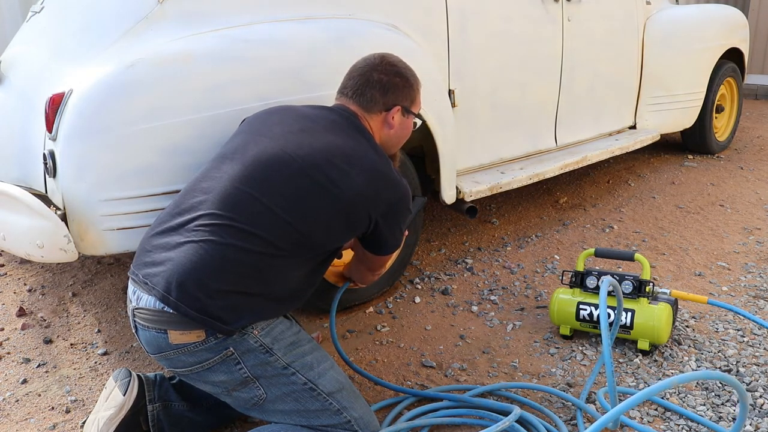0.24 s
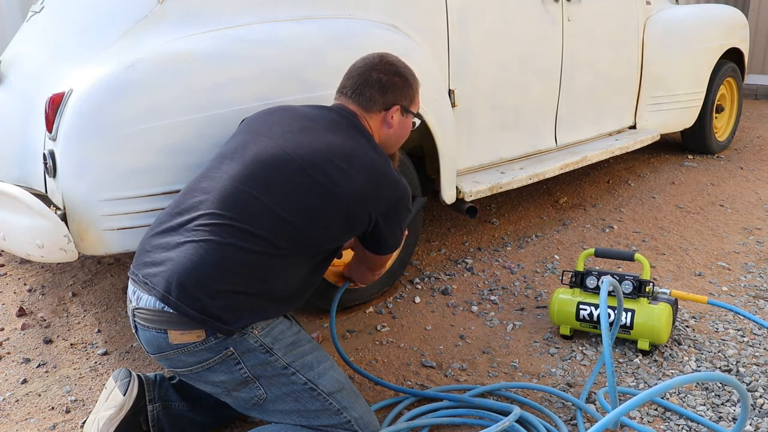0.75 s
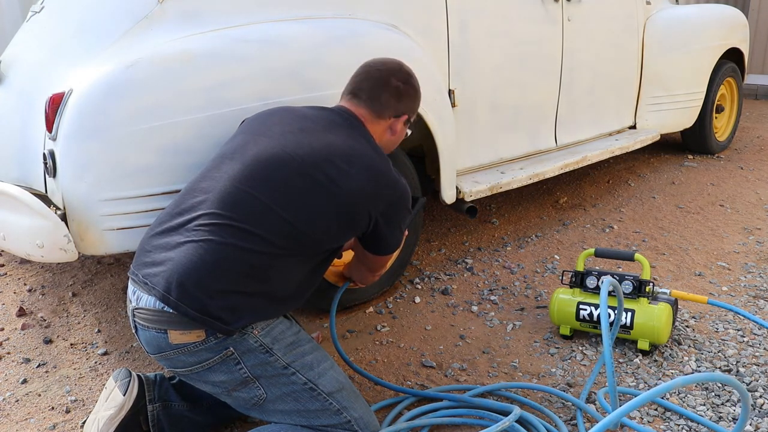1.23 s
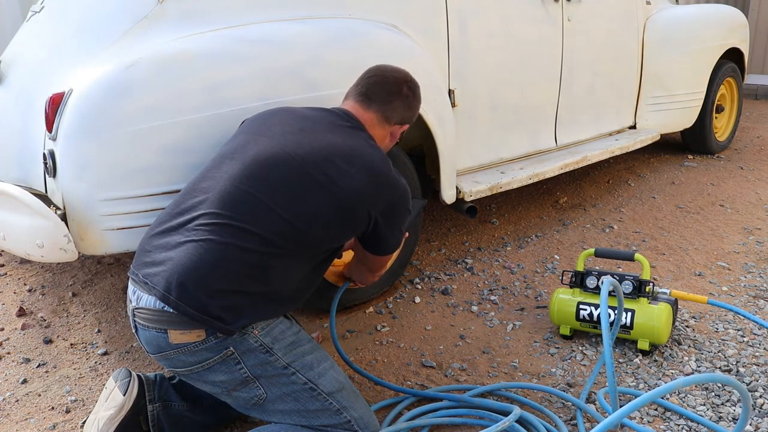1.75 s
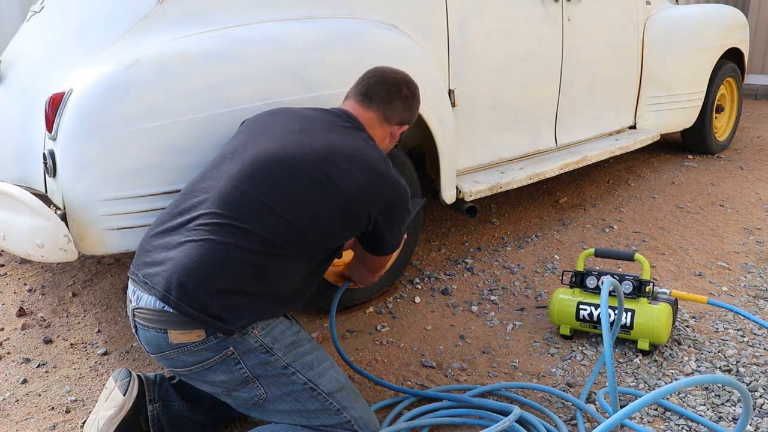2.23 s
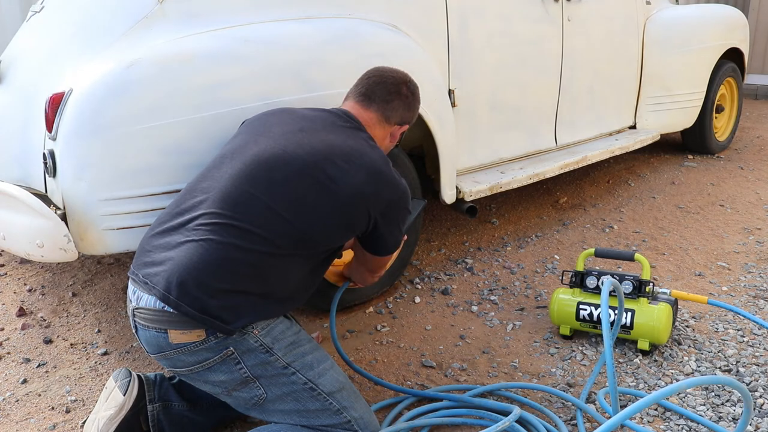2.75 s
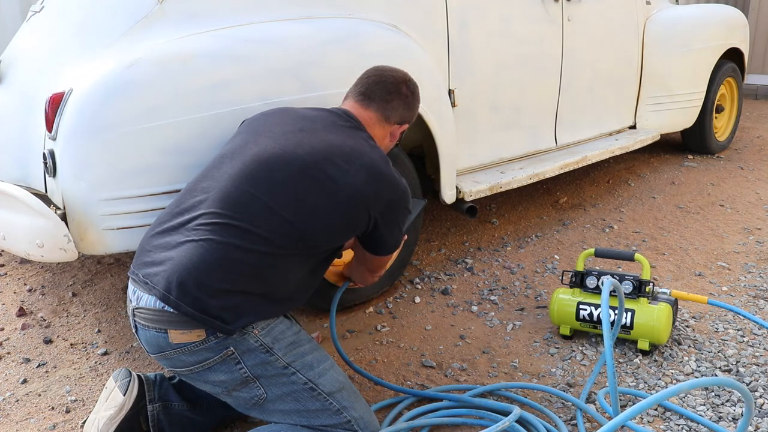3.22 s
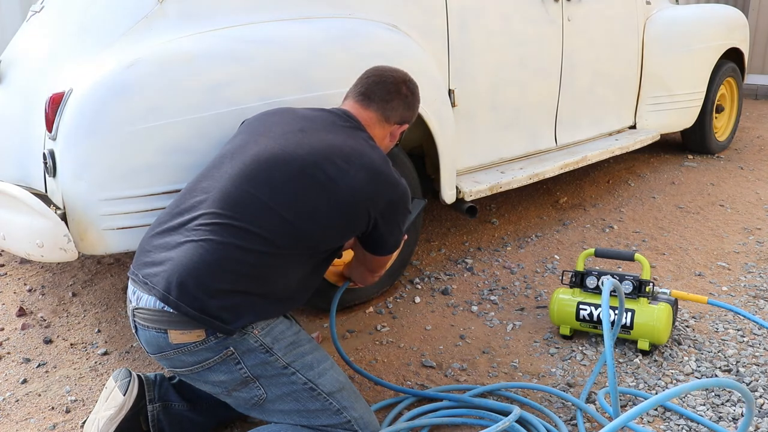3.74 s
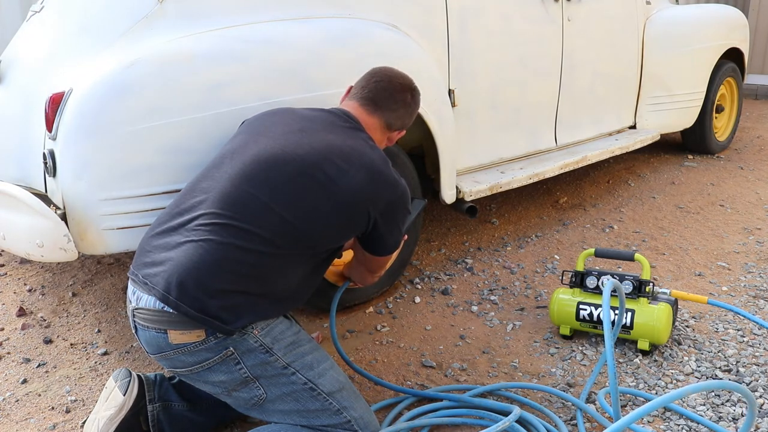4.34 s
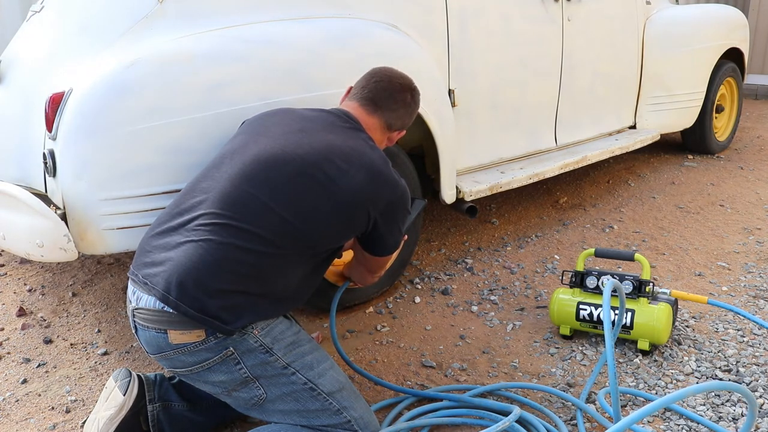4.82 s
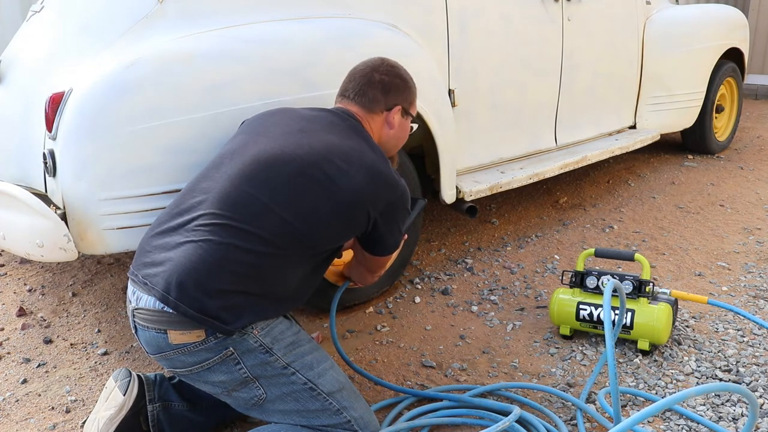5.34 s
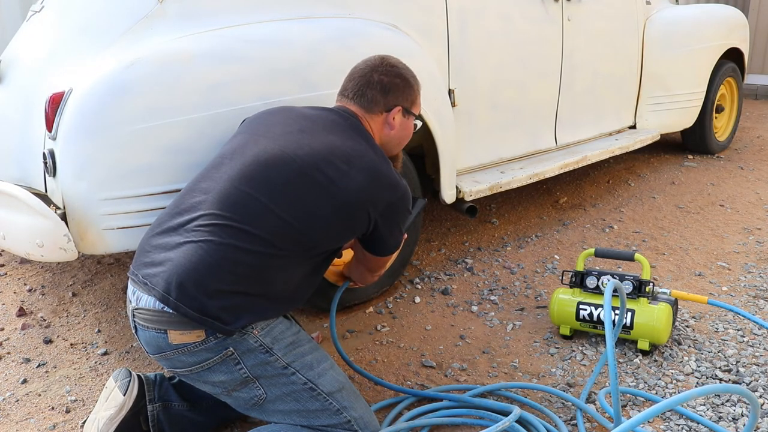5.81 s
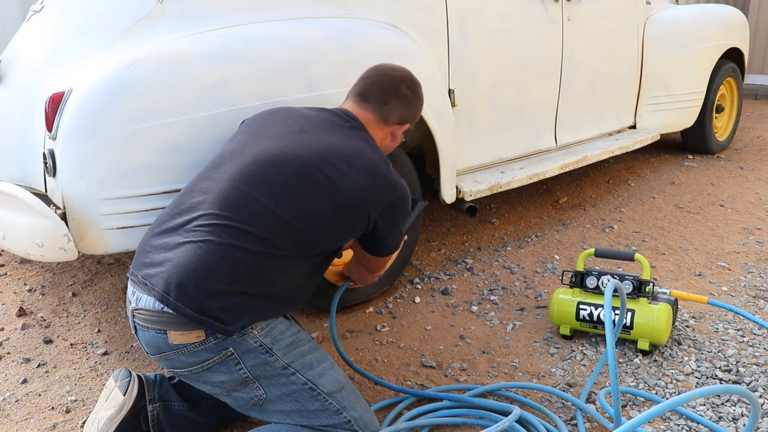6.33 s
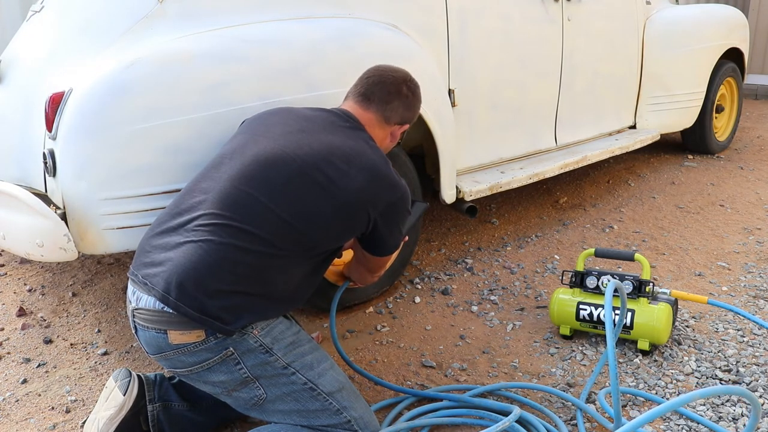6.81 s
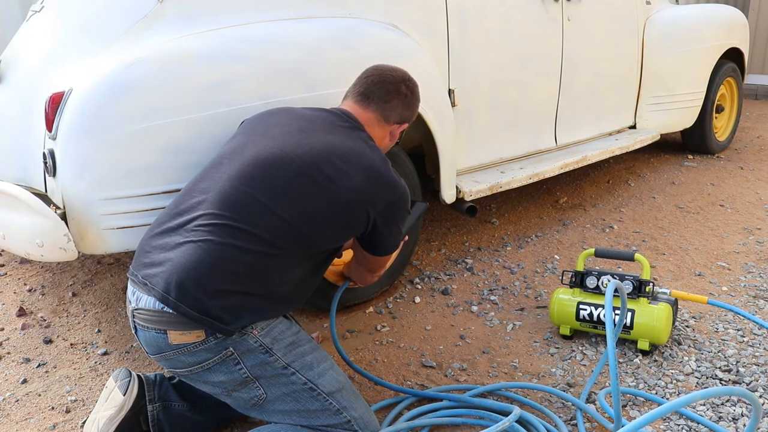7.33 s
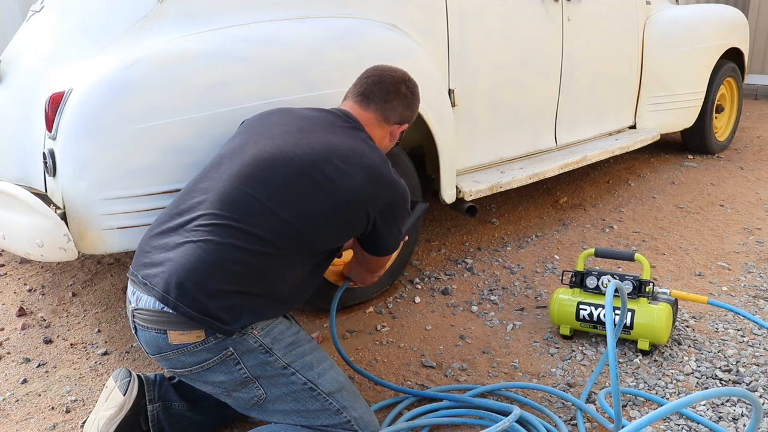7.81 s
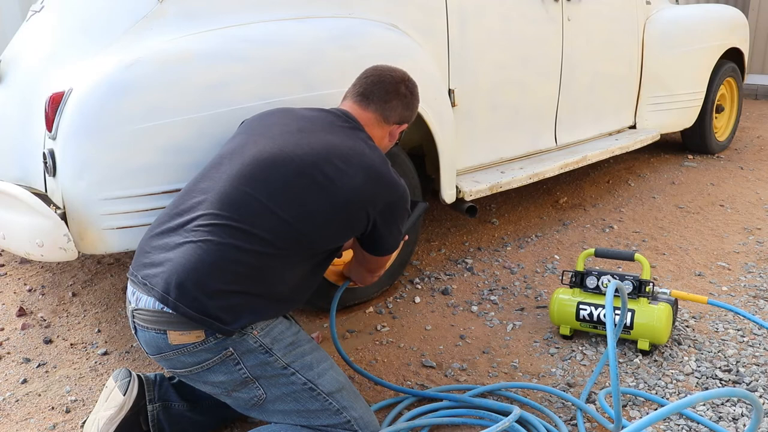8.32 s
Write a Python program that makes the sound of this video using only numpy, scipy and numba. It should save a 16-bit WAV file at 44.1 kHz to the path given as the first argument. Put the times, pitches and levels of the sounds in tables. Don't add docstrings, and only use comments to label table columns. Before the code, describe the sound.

A small piston compressor is already running and never stops. Its strokes, over eighty a second, fuse into a loud, nasal, buzzing drone strongest around four hundred hertz. Fine metallic reed ticking and bearing clatter add a bright rasp, with a faint panel buzz and rushing air beneath. Pitch barely creeps upward. Outdoors on gravel beside a car, one mono microphone a few metres away, dry, with only very short reflections.

```python
import sys
import numpy as np
from scipy import signal
from scipy.fft import rfft, irfft, next_fast_len
from scipy.io import wavfile
from scipy.ndimage import uniform_filter1d
from numba import njit

SR = 44100
rng = np.random.default_rng(int(sys.argv[2]) if len(sys.argv) > 2 else 0)


def transcribe(u):
    v = np.clip(np.atleast_2d(u).T, -1, 1)
    q = np.round(v * 32767).astype(np.int16)
    wavfile.write(sys.argv[1], SR, q)


def amplitude_ratio(level_db):
    exponent = np.asarray(level_db, float) / 20
    return 10 ** exponent


N = 377937

# start_s, speed_turns_per_s
CRANK_SPEED = [
    (0, 82.45),
    (2.17, 82.505),
    (3.37, 82.538),
    (6.97, 82.7),
    (8.57, 82.75),
]
# crank_order, level_db (middle pressure), change_db (low to high pressure)
INTAKE_ORDERS = [(1, -42.9, -.2), (2, -40.2, -.5), (3, -46.9, .4), (4, -26.0, 1.7), (5, -17.2, 1.0),
                 (6, -24.4, -2.4), (7, -30.0, -.7), (8, -24.6, 1.1), (9, -30.7, 3.6), (10, -35.4, 2.1),
                 (11, -33.6, -.9), (12, -41.9, -2.9), (13, -44.3, 2.8), (14, -31.0, -3.5),
                 (15, -34.2, -3.4), (16, -43.3, 2.3)]
# crank_order, level_db (middle pressure), change_db (low to high pressure)
CASING_ORDERS = [(17, -55, -3), (18, -54, 0), (19, -53, -8), (20, -47.5, -3), (21, -52, -3), (22, -51, -1),
                 (23, -53, -13), (24, -48.5, -2), (25, -53, -2), (26, -57, 0), (27, -52.5, 4),
                 (28, -46.3, 12), (29, -53, 0), (30, -56, 1), (31, -48.7, 3), (32, -57, 0), (33, -52, -3),
                 (34, -58, -5), (35, -52, -5), (36, -48, -3), (37, -56, 3), (38, -51, -2), (39, -57.5, 5),
                 (40, -57, 2), (41, -70, 12), (42, -63, -4), (43, -63.5, 1), (44, -63, -7)]
# delay_s, share
GROUND_ECHOES = [(0.00336, -0.692), (0.0028855, 0.719), (0.005134, -0.85), (0.0044032, -0.417),
                 (0.0002263, -0.303)]
# delay_s, share
CASING_PATH = [(0.0027848, 0.53), (0.0006545, 0.4765), (0.00531, 0.133)]
# ring_hz, t60_s, crank_angle_turns, low_pressure_db, high_pressure_db
OUTLET_REED = [(4191, .075, .9092, -51.8, -49.7), (4480, .043, .0195, -56.8, -53.7),
               (4857, .065, .9692, -50.3, -47.7), (4888, .053, .101, -48.3, -43.9),
               (5094, .12, .9163, -49.4, -43.4), (5234, .009, .017, -40.0, -55.1),
               (5443, .12, .0735, -69.6, -51.5), (5784, .02, .005, -49.3, -52.9),
               (8042, .037, .91, -55.7, -77.0), (8257, .025, .0826, -58.2, -76.5),
               (8536, .017, .9635, -61.0, -77.6)]
# ring_hz, t60_s, crank_angle_turns, low_pressure_db, high_pressure_db
INLET_REED = [(3980, .026, .1832, -50.8, -59.2), (6047, .12, .3516, -57.1, -61.2),
              (6201, .031, .2715, -57.0, -53.0), (6363, .102, .2423, -55.0, -51.1),
              (6433, .12, .2956, -63.7, -51.0), (7721, .088, .17, -54.8, -67.8),
              (7844, .036, .235, -57.5, -52.8), (7970, .018, .3086, -57.2, -53.7),
              (9495, .12, .2062, -66.8, -91.1), (9508, .018, .2653, -55.4, -53.0),
              (9567, .089, .1727, -87.7, -62.0), (9851, .011, .2058, -64.1, -58.2)]
# ring_hz, t60_s, crank_angle_turns, low_pressure_db, high_pressure_db
PISTON_ROCK = [(5094, .02, .4372, -41.5, -53.2), (5364, .12, .5228, -67.9, -50.7),
               (5808, .043, .4131, -52.5, -53.7), (7344, .077, .6378, -71.3, -61.0),
               (8892, .041, .6138, -69.4, -66.4), (9014, .12, .62, -66.8, -83.9),
               (9366, .008, .5062, -60.8, -54.9)]
# pitch_hz, level_db (per crank order)
BEARING_CLATTER = [(3650, -70), (4000, -74.5), (4700, -71), (6300, -72.5), (6700, -74), (7300, -79.5),
                   (7700, -81.5), (8300, -85), (9300, -85), (10300, -93.5), (13000, -97.5), (15500, -100)]
# pitch_hz, width_hz, level_db, burst_spread_db, bursts_per_s
LOOSE_PANEL = (1437, 19, -52.5, 1, 5)
# pitch_hz, level_db (per Hz)
AIR_RUSH = [(30, -95), (100, -85), (230, -85.5), (400, -72.5), (900, -73), (1300, -75), (1750, -77),
            (2400, -80.5), (3600, -88), (4400, -83), (6400, -91.5), (6650, -99), (9900, -104),
            (10400, -109.5), (15700, -112)]
# pitch_hz, width_hz, level_db (per Hz at centre)
HOUSING_MODES = [(62, 8, -80), (470, 90, -69), (830, 30, -73), (1040, 25, -69), (1187, 70, -67),
                 (1435, 30, -73), (1559, 30, -76), (1951, 50, -74), (2030, 30, -75), (2100, 40, -76),
                 (2190, 30, -77), (2272, 35, -73), (2340, 60, -77), (2602, 25, -79), (2895, 40, -78),
                 (3000, 70, -81), (3150, 120, -83), (3990, 50, -84), (4667, 120, -79), (5111, 60, -85),
                 (6030, 80, -88), (6350, 120, -84), (7720, 100, -92), (7840, 100, -92), (9489, 70, -94),
                 (10676, 80, -108), (13300, 150, -110), (13600, 100, -110), (14900, 150, -112)]
# pitch_hz, width_hz, depth_db
GROUND_DIPS = [(990, 40, 4), (1380, 40, 7), (1495, 40, 7), (1770, 120, 6), (2145, 30, 5), (2480, 120, 4),
               (2800, 100, 4), (3770, 80, 4), (4960, 90, 5), (5570, 80, 5), (5950, 60, 4), (7200, 150, 4),
               (8350, 200, 3)]


def walk(rate):
    hold = int(SR / rate)
    steps = np.repeat(rng.standard_normal(N // hold + 1), hold)
    slewed = uniform_filter1d(uniform_filter1d(steps, hold), hold)
    return 1.1 * slewed[:N]


def each_turn(orders, turn):
    points = 8192
    shape = irfft(orders, points) * points / 2 * np.sqrt(2)
    return np.interp(turn % 1 * points, np.arange(points), shape, period=points)


def echoes(order, paths):
    mean_speed = np.mean(np.array(CRANK_SPEED)[:, 1])
    shift = 1
    for delay_s, share in paths:
        late = np.exp(-2j * np.pi * order * mean_speed * delay_s)
        shift = shift * (late - share) / (1 - share * late)
    return shift


def stroke(turn, pressure):
    stroke_turn, casing_lag_turns, flicker_db = .5857, .2719, .08
    order, middle_db, change_db = np.transpose(INTAKE_ORDERS + CASING_ORDERS)

    middle = np.log(amplitude_ratio(middle_db))
    cepstrum = irfft(np.r_[middle[0], middle, np.full(20, middle[-1])])
    cepstrum[65:] = 0
    timing = -np.exp(2j * rfft(cepstrum).imag[1:len(order) + 1])

    casing = echoes(order, CASING_PATH) * np.exp(-2j * np.pi * order * casing_lag_turns)
    timing = timing * echoes(order, GROUND_ECHOES) * np.where(order > len(INTAKE_ORDERS), casing, 1)

    out = 0
    for stage, share in enumerate((-.5, 0, .5)):
        level = amplitude_ratio(middle_db + share * change_db)
        shape = each_turn(np.r_[0, level * timing], turn - stroke_turn)
        out = out + np.clip(1 - abs(2 * pressure - stage), 0, 1) * shape
    return out * amplitude_ratio(flicker_db * walk(3))


@njit
def ring(at, size, hz, t60):
    out, state, k = np.empty(N), 0j, 0
    rate = (2j * np.pi * hz - np.log(1000.) / t60) / SR
    step = np.exp(rate)
    for i in range(N):
        state *= step
        if k < len(at) and at[k] <= i:
            state += size[k] * np.exp(rate * (i - at[k]))
            k += 1
        out[i] = state.imag
    return out


def valves(turn):
    scatter_db, jitter_s, gain_db = 1.0, 3.5e-6, -0.2
    swell_db = 1.5
    parts = (OUTLET_REED, .006), (INLET_REED, .0015), (PISTON_ROCK, .005)
    turns = np.arange(int(turn[-1]) + 1)
    load = turns / turn[-1]
    out = 0
    for part, lag_turns in parts:
        for hz, t60, angle, low_db, high_db in part:
            jitter, scatter = rng.standard_normal((2, len(turns)))
            strike_turn = turns + angle + lag_turns * (load - .5)
            at = np.interp(strike_turn, turn, np.arange(len(turn)))
            blow_db = low_db + (high_db - low_db) * load + scatter_db * scatter
            blow_db = blow_db + gain_db + swell_db * np.sin(np.pi * load)
            out = out + ring(at + jitter_s * SR * jitter, amplitude_ratio(blow_db), 1. * hz, 1. * t60)
    return out


def bearings(turn, pressure):
    hz, db = np.transpose(BEARING_CLATTER)
    order_hz = np.arange(200) * CRANK_SPEED[0][1]
    gain = amplitude_ratio(np.interp(np.log(order_hz + 1), np.log(hz), db, left=-200, right=-200))
    chance = rng.standard_normal((2, len(gain), 2)) @ np.array([1, 1j]) / np.sqrt(2)
    low, high = (each_turn(gain * c, turn) for c in chance)
    swing = .7 * np.pi / 2 * pressure
    return np.cos(swing) * low + np.sin(swing) * high


def panel():
    hz, width, level_db, burst_db, rate = LOOSE_PANEL
    band = signal.butter(2, [hz - width / 2, hz + width / 2], "bandpass", fs=SR, output="sos")
    buzz = signal.sosfilt(band, rng.standard_normal(N))
    return buzz / buzz.std() * amplitude_ratio(level_db + burst_db * walk(rate))


def rush(turn, pressure):
    throb, throb_turn, flicker_db = 0.13, 0.38, .3
    load_db = -.9
    size = next_fast_len(N)
    f = np.arange(size // 2 + 1) * SR / size + 1
    hz, db = np.transpose(AIR_RUSH)
    power = amplitude_ratio(np.interp(np.log(f), np.log(hz), db)) ** 2
    for centre_hz, width, peak_db in HOUSING_MODES:
        power = power + amplitude_ratio(peak_db) ** 2 / (1 + (2 * (f - centre_hz) / width) ** 2) ** 2
    for centre_hz, width, depth_db in GROUND_DIPS:
        power = power * amplitude_ratio(-2 * depth_db / (1 + (2 * (f - centre_hz) / width) ** 2))
    air = irfft(rfft(rng.standard_normal(size)) * np.sqrt(power * SR / 2), size)[:N]
    swell = 1 + throb * np.cos(2 * np.pi * (turn - throb_turn))
    return air * swell * amplitude_ratio(flicker_db * walk(6) + load_db * (pressure - 1.5))


def scene():
    start_turn, wander_turns = .026, .00015
    start_s, speed = np.transpose(CRANK_SPEED)
    turn = start_turn + np.cumsum(np.interp(np.arange(N) / SR, start_s, speed)) / SR
    turn = turn + wander_turns * walk(12)
    pressure = np.arange(N) / N
    machine = stroke(turn, pressure) + valves(turn) + bearings(turn, pressure)
    mix = machine + panel() + rush(turn, pressure)
    return mix[None]


def band_limit(x):
    return signal.sosfilt(signal.butter(12, 15640, fs=SR, output="sos"), x)


def record(dry):
    return band_limit(dry)


dry = scene()
out = record(dry)
transcribe(out)
```